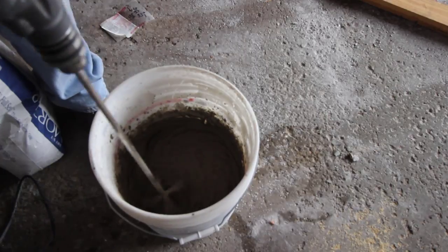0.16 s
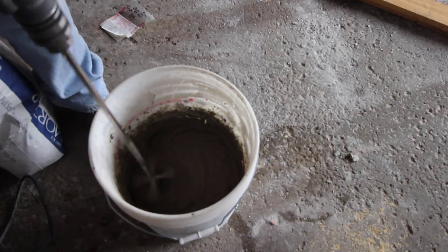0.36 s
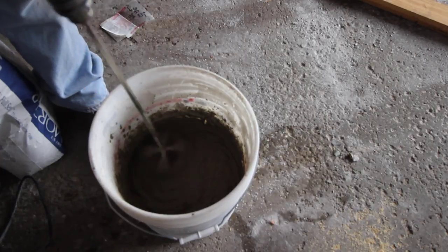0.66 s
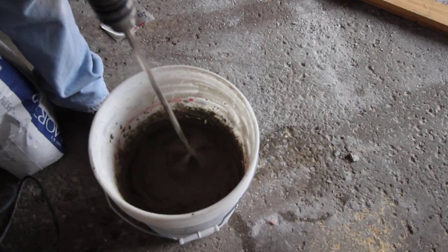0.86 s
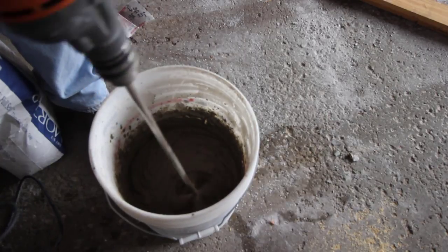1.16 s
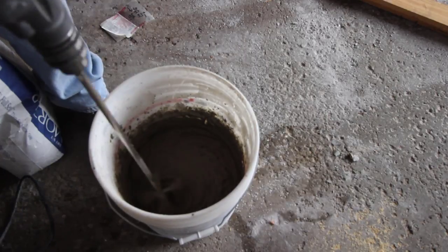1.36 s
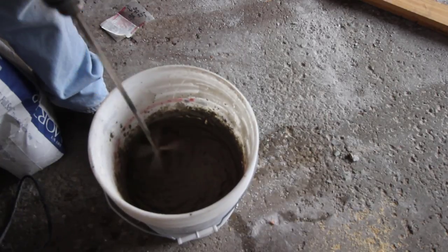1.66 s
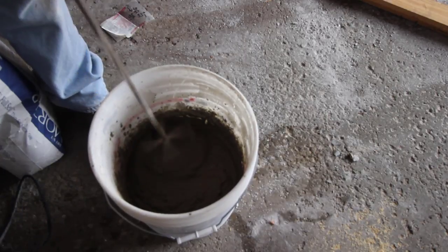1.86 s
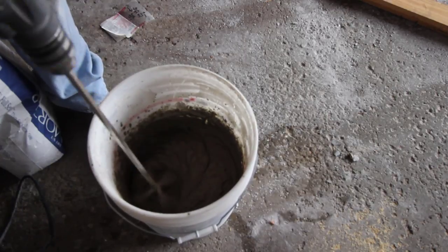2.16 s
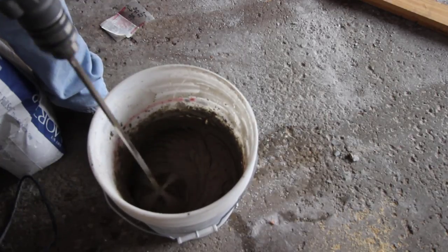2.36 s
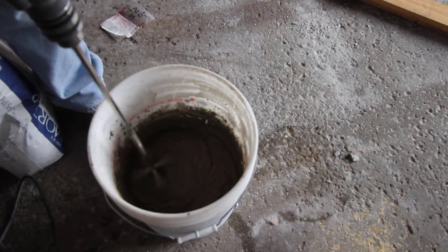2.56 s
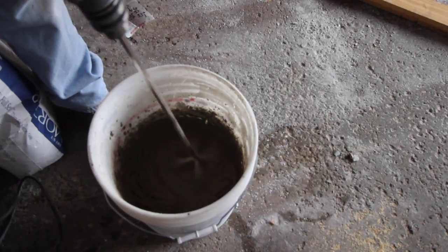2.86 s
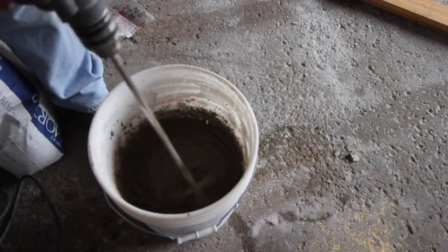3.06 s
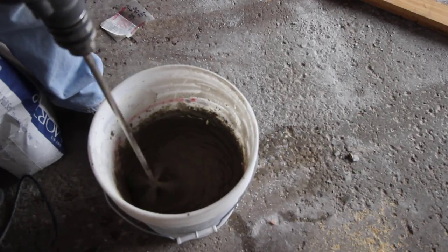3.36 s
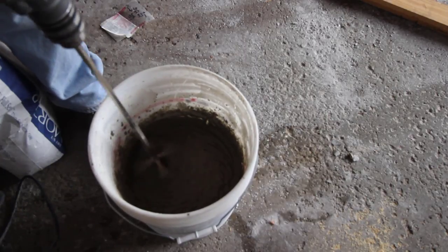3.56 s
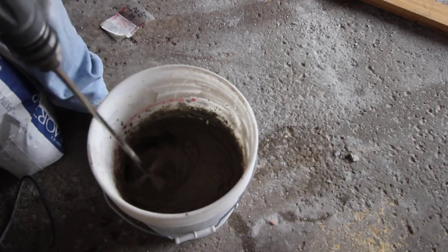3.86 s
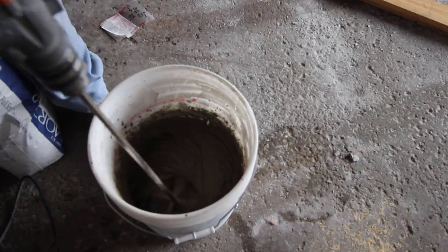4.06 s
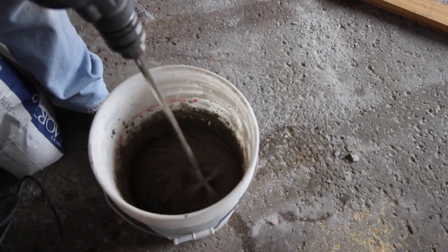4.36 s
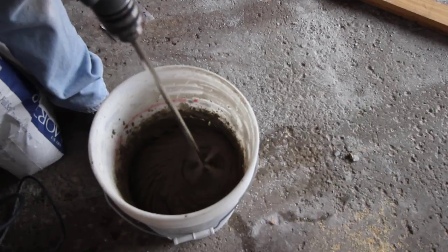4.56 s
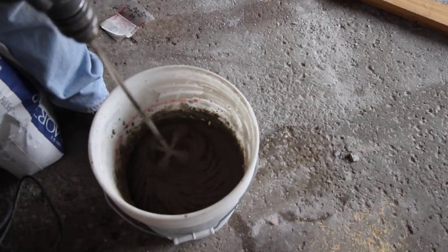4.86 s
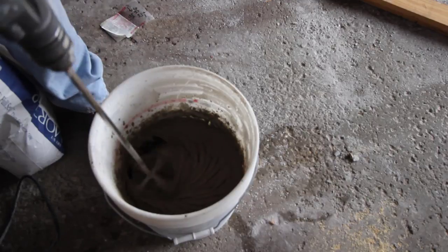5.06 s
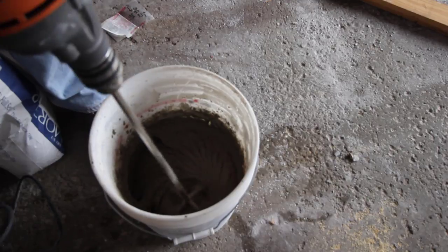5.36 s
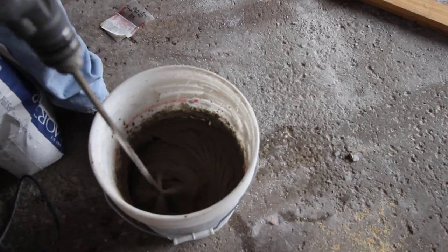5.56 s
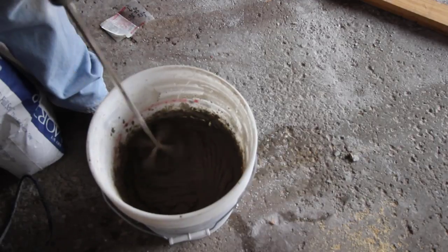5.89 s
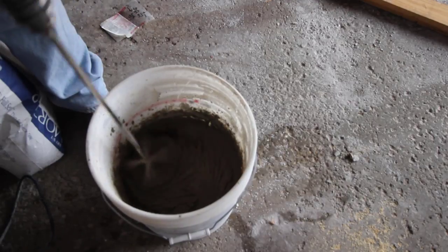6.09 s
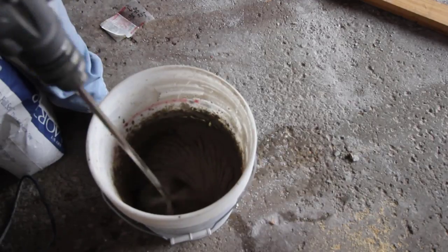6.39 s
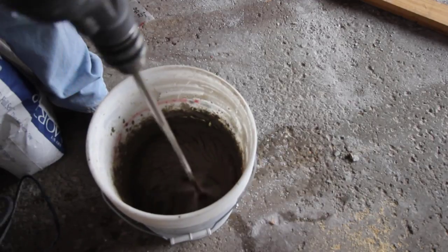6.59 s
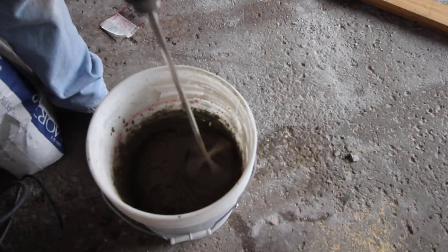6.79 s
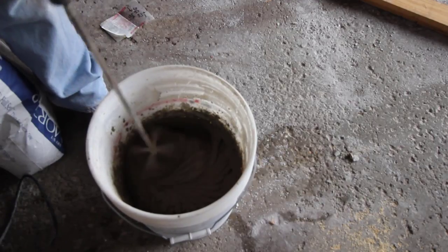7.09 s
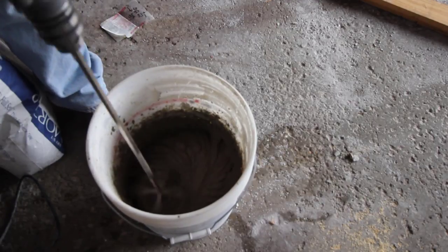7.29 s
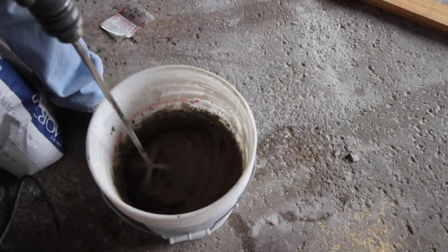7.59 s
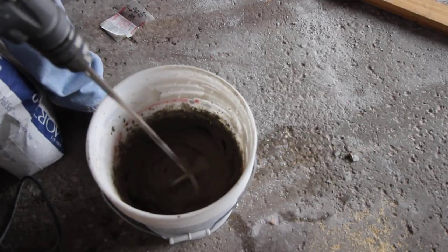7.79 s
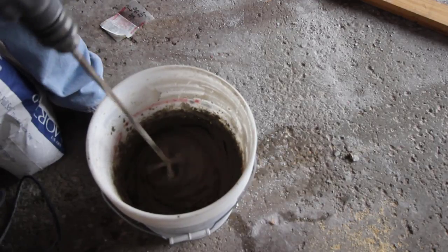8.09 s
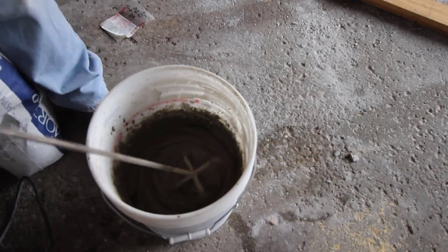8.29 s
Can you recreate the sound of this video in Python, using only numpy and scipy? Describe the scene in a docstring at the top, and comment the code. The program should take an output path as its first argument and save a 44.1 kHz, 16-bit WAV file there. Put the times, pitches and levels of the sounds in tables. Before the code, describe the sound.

An electric drill already turning whines, buzzes and hisses, briefly speeding up near one second, labouring near four and five, then recovering. Thick mortar sloshes with low, hollow plastic thumps, gritty squelches and uneven surges; the chuck chatters and clinks. The sound is close and thin in the bass, with a short hard room reflection. Right at the end the motor cuts out over a bump.

```python
"""Bare concrete room: a mains drill at part trigger turns a paddle through wet mortar in a plastic bucket.
Its speed wavers with the drag: gears whine as tooth harmonics, fan and brushes hiss as coloured noise,
and the speed control buzzes the motor in short current pulses. The paddle slops the mortar and knocks
the bucket (noise and pushes through damped modes), the chuck rattles; at the end the trigger is let go."""
import sys
import numpy as np
from scipy import signal
from scipy.fft import rfft, irfft, next_fast_len
from scipy.io import wavfile
from scipy.ndimage import uniform_filter1d

SR = 44100
rng = np.random.default_rng(int(sys.argv[2]) if len(sys.argv) > 2 else 0)


def to_wav(sig):
    """Store sig (one row per channel, or 1-D mono) as 16-bit WAV at the path in sys.argv[1].

    Samples outside -1..1 are clipped; the rate is SR.
    """
    pcm = np.clip(np.atleast_2d(sig), -1, 1) * 32767
    pcm = np.round(pcm).astype(np.int16)
    wavfile.write(sys.argv[1], SR, pcm.T)  # frames by channels


N = 372204
T = np.arange(N) / SR

# modes of the bucket with its load of mortar: (frequency [Hz], width [Hz], relative level [dB])
BUCKET_MODES = [(143, 37, -14), (257.4, 33, -0.5), (373, 114, -6), (452, 37, -7), (514, 28.3, 1.5),
                (573.7, 11, 2), (680, 62, -9.5), (1000, 190, -12)]
# response of the motor housing: (frequency [Hz], gain [dB])
HOUSING_RESPONSE = [(800, -30), (3400, -27), (3900, -11), (4450, -5), (5100, 2), (5900, -0.5), (7000, -15),
                    (9000, -19.5), (10200, 2.5), (11500, -8.5), (14000, -17)]
# spectrum of loose clatter, also of wet sand: (frequency [Hz], gain [dB])
CLATTER_SPECTRUM = [(100, -30), (400, -5), (1000, -4), (1700, 1), (2700, 1), (3600, 0.5), (4500, -2.5),
                    (6000, -3), (15500, -20)]

MAINS_PULSE_HZ = 120.03  # one pulse each half wave
RELEASE_S = 8.27  # the trigger is let go
WHEEL_TEETH, BAR_EDGES_PER_TOOTH = 39, 12
RATTLE_RISE_S, RATTLE_DECAY_S = 0.0019, 0.0046


def undb(db):
    """Decibels to gain."""
    return 10 ** (np.asarray(db) / 20)


def unit(x):
    """Scale to rms 1."""
    return x / np.sqrt(np.mean(x ** 2))


def curves(table):
    """Columns of a table of timed rows, interpolated to one value a sample."""
    times_s, *columns = np.transpose(table)
    return [np.interp(T, times_s, column) for column in columns]


def response(points, hz):
    """Gain of a (Hz, dB) outline at the given frequencies."""
    point_hz, db = np.transpose(points)
    return undb(np.interp(np.log(hz + 1), np.log(point_hz), db))


def colour(x, points):
    """Filter by a (Hz, dB) outline."""
    size = next_fast_len(N)
    hz = np.arange(size // 2 + 1) * SR / size
    return irfft(rfft(x, size) * response(points, hz), size)[:N]


def noise():
    """White noise of rms 1."""
    return rng.standard_normal(N)


def walk(rate_hz):
    """Smooth random curve of rms 1 that takes a new course rate_hz times a second."""
    hold = max(int(SR / rate_hz), 1)
    steps = np.repeat(rng.standard_normal(N // hold + 1), hold)[:N]
    return unit(uniform_filter1d(steps, hold))


def grains(rate_hz, spread_db):
    """Random clicks of uneven size and either sign, scaled to rms 1."""
    hits = rng.random(N) < rate_hz / SR
    size = undb(spread_db * np.clip(noise(), -2, 2))
    return unit(hits * np.sign(noise()) * size)


def bell(s, length_s):
    """Smooth rise and fall around a moment, 1 at its height and 1/e half a length away."""
    return np.exp(-(2 * (T - s) / length_s) ** 2)


def bursts(table, rise_s, decay_s):
    """Envelope that swells to each event's level and dies away."""
    out = np.zeros(N)
    for s, db in table:
        near = slice(max(int((s - .15) * SR), 0), int((s + .3) * SR))
        age_s = T[near] - s
        out[near] += undb(db) * np.exp(np.minimum(age_s / rise_s, -age_s / decay_s))
    return out


def resonate(x, hz, width_hz):
    """One damped resonance, gain 1 at its centre."""
    return signal.lfilter(*signal.iirpeak(hz, hz / width_hz, fs=SR), x)


def room_air():
    """Room background: noise weighted to the bass."""
    # (frequency [Hz], gain [dB])
    air_spectrum = [(25, -3.5), (500, -19), (15000, -24)]
    return unit(colour(noise(), air_spectrum))


def room(x, wet_db):
    """Concrete floor and walls return a short, dense tail of decaying noise."""
    t60_s = 0.42
    age_s = T[:SR // 2]
    tail = rng.standard_normal(len(age_s)) * undb(-60 * age_s / t60_s) * (age_s > .003)
    return x + undb(wet_db) * signal.fftconvolve(x, tail / np.linalg.norm(tail))[:N]


def hum():
    """Field coils hum on steady mains harmonics for as long as the trigger is held."""
    # (multiple of the pulse rate, relative level [dB])
    hum_lines = [(6, 1), (10, 0.5)]
    out = 0
    for multiple, db in hum_lines:
        out = out + undb(db) * np.sin(2 * np.pi * (multiple * MAINS_PULSE_HZ * T + rng.random()))
    return out * (T < RELEASE_S)


def bucket(x):
    """Damped modes of the plastic wall and the air above the mortar."""
    return sum(undb(db) * resonate(x, hz, width_hz) for hz, width_hz, db in BUCKET_MODES)


def stirred_bucket(x, wander_s, patchy_db):
    """The moving paddle favours now one mode, now another; the shifting load bends their pitch."""
    ring = 0
    for hz, width_hz, db in BUCKET_MODES:
        ring = ring + undb(db + patchy_db * np.tanh(walk(14))) * resonate(x, hz, width_hz)
    return unit(np.interp(T + wander_s * walk(10), T, ring))


def knocks(contact_s):
    """The paddle bumps the bucket: each push and rebound rings the wall modes."""
    # (time [s], level [dB])
    bumps = [(2.135, -46), (2.166, -43), (3.074, -43), (4.046, -41.5), (4.111, -41), (4.15, -37),
             (7.402, -54), (7.446, -41.5), (8.305, -35.5), (8.321, -45), (8.332, -41)]
    push = np.gradient(bursts(bumps, contact_s, contact_s))
    ring = bucket(push)
    return ring / np.abs(ring).max() * undb(np.max(np.array(bumps)[:, 1]))


def churn(octaves):
    """Churning level in dB: steady stirring plus the power of a surge wherever the blades bite."""
    # blades bite into thick mortar: (time of the height [s], length [s], level [dB])
    surges = [(0.103, 0.5, -62.5), (2.163, 0.16, -61.5), (2.397, 0.21, -63.5), (3.07, 0.35, -59),
              (3.858, 0.31, -62), (4.166, 0.13, -52), (4.382, 0.67, -58), (4.68, 0.18, -57.5),
              (5.39, 0.12, -57.5), (5.814, 0.1, -58.5), (6.23, 0.24, -61), (7.015, 0.2, -59),
              (7.437, 0.076, -57.5), (7.9, 0.41, -60.5), (8.321, 0.14, -49)]
    stir_db, stir_db_per_octave = -67, 1.5  # stirring grows slightly louder as the drill speeds up
    power = undb(stir_db + stir_db_per_octave * octaves) ** 2
    for s, length_s, db in surges:
        power = power + undb(db) ** 2 * bell(s, length_s) ** 2
    return 10 * np.log10(power)


def contact():
    """Mortar gain: the paddle spins clear in its hollow, a dip just before and just after each moment."""
    # (time of the middle [s], spacing of its two dips [s])
    lulls = [(0.991, 0.064), (1.872, 0.052), (3.36, 0.082), (7.322, 0.16)]
    depth = 0
    for s, spacing_s in lulls:
        depth = depth + bell(s, spacing_s) * (2 * (T - s) / spacing_s) ** 2
    return undb(-23 * depth)  # depth peaks at 1/e: dips of 8.5 dB


def mortar(churn_db, turns, slap_rate_hz, slap_db, swell_db, sway_db, drag_db, squelch_db, drag_follow):
    """Blades drag and rub on the low bucket modes, hard slaps ring the higher ones, wet sand squelches."""
    # paddle rubs along the wall, which shudders with a dull note: (time [s], level [dB])
    rub_events = [(0.1, -69), (2.37, -61.5), (3.1, -66), (3.75, -58.5), (4.14, -58), (5.41, -62),
                  (6.22, -62), (6.99, -67)]
    # force of the dragging blades: (frequency [Hz], gain [dB])
    drag_spectrum = [(60, -14), (150, -1.5), (250, 1.5), (400, -7.5), (1500, -19)]
    # force of their slaps: (frequency [Hz], gain [dB])
    slap_spectrum = [(60, -13), (260, -2.5), (480, 5), (1500, -4.5)]
    # each turn of the paddle throws a fresh wave against the wall
    turn_sway = np.sin(2 * np.pi * turns / WHEEL_TEETH)
    swell = undb(swell_db * np.tanh(walk(50)) + sway_db * turn_sway)
    # the drag surges less than the slaps do
    steady = undb(churn_db.mean() + drag_follow * (churn_db - churn_db.mean()))
    rubs = sum(undb(db) * bell(s, length_s=.13) for s, db in rub_events)
    drag_force = (noise() + grains(slap_rate_hz, 2.1)) * swell
    drag = stirred_bucket(colour(drag_force, drag_spectrum), wander_s=0.00061, patchy_db=2.5)
    slap_force = (noise() + undb(slap_db) * grains(slap_rate_hz, 1.5)) * swell
    slaps = stirred_bucket(colour(slap_force, slap_spectrum), wander_s=.001, patchy_db=3.5)
    squelch = unit(colour(grains(1500, 3.2) * swell, CLATTER_SPECTRUM))
    drag_level = np.hypot(steady * undb(drag_db), rubs)
    return undb(churn_db) * slaps + drag_level * drag + steady * undb(squelch_db) * squelch


def ticks():
    """Sharp ticks of steel on steel: very short bursts of bright noise."""
    # (time [s], level [dB])
    tick_events = [(1.634, -38), (1.8412, -39.5), (6.0503, -36.5), (7.0813, -39)]
    # (frequency [Hz], gain [dB])
    steel_spectrum = [(300, -19), (4200, 13.5), (7500, 7), (15500, -7)]
    return unit(colour(noise(), steel_spectrum)) * bursts(tick_events, rise_s=0.00066, decay_s=0.0024)


def rattles():
    """Chuck and gears clatter in their play: short bursts of dense clicks."""
    # (time [s], level [dB])
    rattle_events = [(1.631, -47), (1.671, -50), (1.7652, -41.5), (1.9644, -44), (2.0241, -43),
                     (3.111, -46), (4.2377, -41), (5.117, -47), (5.3502, -41.5), (5.4356, -43.5),
                     (5.7554, -44), (5.7915, -44.5), (5.8449, -44.5), (5.883, -44.5), (5.927, -44),
                     (6.1054, -44), (6.167, -44.5), (7.2062, -47), (7.44, -42), (7.6832, -39.5)]
    clatter = unit(colour(grains(6000, 0.73), CLATTER_SPECTRUM))
    return clatter * bursts(rattle_events, RATTLE_RISE_S, RATTLE_DECAY_S)


def shaft(turns, chuck_db, decay_turns, scatter_db):
    """The paddle shaft clinks in the chuck once a turn, and now and then rings out clearly."""
    # clear rings: (time [s], level [dB])
    clinks = [(2.085, -43), (6.374, -44), (6.407, -41), (7.241, -47)]
    over_chuck_db = -5.5
    ring = unit(resonate(noise(), hz=3450, width_hz=660))
    each_turn = np.exp(-(turns / WHEEL_TEETH % 1) / decay_turns)
    each_turn = unit(each_turn * undb(scatter_db * walk(11)))
    clear = bursts(clinks, RATTLE_RISE_S, RATTLE_DECAY_S)
    return ring * (undb(chuck_db + over_chuck_db) * each_turn + clear)


def chuck(turns, swing_db, chatter_db):
    """The loose chuck chatters: clicks that swell once a turn of the paddle."""
    sway = np.sin(2 * np.pi * turns / WHEEL_TEETH + .5 * walk(4.5))
    clicks = grains(2500, 1.6) * undb(swing_db * sway + chatter_db * walk(30))
    return unit(colour(clicks, CLATTER_SPECTRUM))


def fan_and_brushes(pulses, spark_share, grit_db, flicker_db, shell_db):
    """Fan air with brush crackle that grows with each current pulse; sparser grit rings the hollow shell."""
    # (frequency [Hz], gain [dB])
    hiss_spectrum = [(100, -53), (600, -9), (1000, -10), (2000, -7), (4500, -2), (5600, 3), (7600, -4),
                     (9800, -5.5), (15500, -13.5)]
    # resonances of the drill's shell and vents: (frequency [Hz], width [Hz], relative level [dB])
    shell_modes = [(1580, 99, -1), (2190, 450, 0), (3360, 310, 1), (5030, 340, 4.5), (6270, 340, 0),
                   (8080, 500, -3.5)]
    sparking = 1 + spark_share * (pulses - 1)
    crackle = grains(2500, 3.6) * sparking
    air = unit(colour(noise() + undb(grit_db) * crackle, hiss_spectrum))
    grit = grains(1400, 2.1) * sparking
    shell = unit(sum(undb(db) * resonate(grit, hz, width_hz) for hz, width_hz, db in shell_modes))
    return (air + undb(shell_db) * shell) * undb(flicker_db * walk(70))


def commutator(tooth_hz, turns, smear_rad, flutter_db):
    """Brushes skip over the bar edges twelve times a tooth: a thin, rough whistle."""
    phase = 2 * np.pi * BAR_EDGES_PER_TOOTH * turns + smear_rad * walk(300)
    gain = response(HOUSING_RESPONSE, BAR_EDGES_PER_TOOTH * tooth_hz)
    return gain * np.sin(phase) * undb(flutter_db * walk(25))


def gears(tooth_hz, turns, pulses, flutter_db, smear_rad, spindle_depth, fade_db, rasp_rad):
    """Fluttering tooth harmonics; play and torque pulses shift their phase, the high ones most.
    The weak ones fade in and out, and the wheel sways them all once a turn."""
    # main whines as the tooth load shifts: (time [s], levels of tooth harmonics 2, 3, 4, 5 [dB])
    whines = [(0.0, -59, -69, -59, -70), (0.38, -62.5, -70, -64.5, -58), (0.93, -63, -61, -57, -70),
              (1.06, -69, -66, -72, -69), (1.22, -57, -64, -59, -66), (1.36, -60.5, -56, -62, -63),
              (1.78, -69, -74, -69, -60.5), (1.9, -66, -56.5, -67, -61), (2.28, -59, -68, -58.5, -53.5),
              (2.67, -65, -77, -66, -63), (2.79, -59.5, -62, -63, -57), (3.17, -60, -55, -65, -59),
              (3.55, -71, -63, -61.5, -67), (3.93, -63, -62, -62.5, -61.5), (4.28, -63, -64, -61, -66),
              (4.42, -76, -72, -65, -80), (4.95, -54.5, -67, -59.5, -59), (5.33, -67.5, -66, -73, -78),
              (5.58, -62.5, -67, -57.5, -66), (5.97, -67, -70, -62, -57), (6.85, -59.5, -59, -63.5, -56),
              (7.36, -65.5, -68.5, -71, -65), (7.49, -60, -64, -58.5, -63), (7.95, -66.5, -69, -58.5, -66),
              (8.15, -65, -71, -66, -66)]
    # weaker lines, quarter steps are the motor shaft: (multiple of the tooth rate, relative level [dB])
    weak_lines = [(1, -7.5), (3.75, -9), (4.25, -10.5), (5.25, -5), (9, -6), (9.75, -8)]
    # response of the gear case: (frequency [Hz], gain [dB])
    case_response = [(1100, -11), (1450, 10.5), (3300, -1), (5200, 4), (6000, -5), (9800, 5)]
    weak_db = -62.5
    lines = [(multiple, np.sqrt(2) * undb(db)) for multiple, db in enumerate(curves(whines), 2)]
    for multiple, db in weak_lines:
        fading = undb(weak_db + db + fade_db * np.tanh(walk(5)))
        lines.append((multiple, fading * response(case_response, multiple * tooth_hz)))
    out, play = 0, walk(170)
    for multiple, gain in lines:
        phase = 2 * np.pi * (multiple * turns + rng.random())
        phase = phase + multiple * (smear_rad * play + rasp_rad * pulses)
        out = out + gain * undb(flutter_db * walk(45)) * np.sin(phase)
    return out * (1 + spindle_depth * np.sin(2 * np.pi * turns / WHEEL_TEETH))


def current(octaves):
    """The speed control fires a short jolt each half wave of the mains, longer at higher speed.
    A labouring motor draws some current between jolts; all fades out over the 20 ms from the release."""
    first_pulse_s, jolt_s = .0001, .00057  # jolt_s: standard deviation at mean speed
    labour_octaves, labour_per_octave = -.21, 0.98  # onset of labouring; growth of the steady current
    from_peak_s = (((T - first_pulse_s) * MAINS_PULSE_HZ + .5) % 1 - .5) / MAINS_PULSE_HZ
    jolts = np.exp(-.5 * (from_peak_s / (jolt_s * 2 ** (octaves / 2))) ** 2)
    between = labour_per_octave * np.maximum(labour_octaves - octaves, 0)
    # 1 until the release, 0 from 20 ms later
    trigger = np.clip((RELEASE_S - T) / 0.02 + 1, 0, 1)
    return unit(jolts + between) * trigger


def motor(tooth_hz, turns, pulses, smear_rad, jolt_twist_rad, resonance_share, uneven_db,
          ring_hz, ring_width_hz, ring_db):
    """Slots and bars pull on the resonant housing; each jolt twists their phase and rings the stator."""
    # pull of armature slots and commutator bars: (multiple of the tooth rate, relative level [dB])
    pull_lines = [(3, -6), (6, -2.5), (12, -11), (18, -4)]
    out, power = 0, 0
    for multiple, db in pull_lines:
        gain = undb(db) * response(HOUSING_RESPONSE, multiple * tooth_hz)
        phase = 2 * np.pi * multiple * turns + jolt_twist_rad * pulses + smear_rad * walk(400)
        out = out + gain * np.sin(phase)
        power = power + gain ** 2 / 2
    # only a share of the housing's level swings is kept
    evened = out / np.sqrt(power) ** (1 - resonance_share)
    buzz = pulses * undb(uneven_db * walk(120)) * evened
    return buzz + undb(ring_db) * resonate(buzz, ring_hz, ring_width_hz)


def scene():
    """Drill and bucket side by side in the room."""
    # motor speed: (time [s], tooth rate of the pinion [Hz])
    speed = [(0.01, 997), (0.1, 879), (0.34, 964), (0.68, 990), (0.78, 1075), (0.9, 1295), (0.99, 1437),
             (1.09, 1504), (1.145, 1473), (1.295, 1128), (1.44, 1050), (1.68, 974), (1.75, 997),
             (1.94, 1139), (2.2, 1035), (2.46, 984), (2.65, 928), (2.81, 1053), (3.04, 1110), (3.3, 1023),
             (3.74, 975.4), (4.05, 895), (4.18, 789.6), (4.31, 771), (4.44, 886), (4.52, 924),
             (4.71, 882.7), (5.1, 736), (5.21, 725.5), (5.39, 803.6), (5.5, 805), (5.75, 876), (6.07, 1059),
             (6.46, 955), (6.58, 974), (6.89, 1079), (7.0, 1074), (7.29, 895.5), (7.42, 950), (7.5, 869),
             (7.63, 804.5), (7.74, 809), (7.9, 885), (8.18, 894.5), (8.35, 561), (8.44, 331)]
    # drill's treble, shared by hiss and whistle: (time [s], level [dB])
    treble = [(0.0, -54), (0.45, -53.5), (1.0, -51.5), (1.52, -53.5), (1.87, -59.5), (1.96, -53.5),
              (2.94, -53.5), (3.19, -55.5), (3.97, -53.5), (4.5, -58.5), (4.85, -53.5), (5.51, -56),
              (6.89, -52.5), (7.14, -55.5), (8.09, -54), (8.25, -58.5)]
    # chuck's clatter: (time [s], level [dB])
    chuck_level = [(0.0, -54.5), (1.05, -60.5), (1.35, -56.5), (1.87, -65), (1.97, -67), (2.57, -55.5),
                   (4.02, -56.5), (4.18, -52.5), (5.1, -59.5), (7.4, -70.5), (7.67, -55.5), (8.25, -53)]
    # motor's buzz as trigger and drag change its current: (time [s], level [dB])
    buzz_level = [(0.0, -60), (0.35, -50), (0.82, -55), (0.94, -48), (1.14, -47.5), (1.28, -58),
                  (1.55, -52.5), (1.92, -56.5), (2.58, -51), (3.1, -50.5), (3.6, -52.5), (4.08, -57.5),
                  (4.3, -51.5), (4.7, -50), (4.83, -61), (4.97, -53.5), (5.38, -50.5), (5.7, -51.5),
                  (6.15, -54), (6.75, -50.5), (7.18, -57), (7.35, -49.5), (7.53, -55), (7.8, -52),
                  (8.25, -52.5)]
    tooth_hz, = curves(speed)
    treble_db, = curves(treble)
    chuck_db, = curves(chuck_level)
    buzz_db, = curves(buzz_level)
    octaves = np.log2(tooth_hz / tooth_hz.mean())
    # lumps in the mix make the speed shiver; turns counts pinion teeth
    turns = np.cumsum(tooth_hz * (1 + 0.003043 * walk(50))) / SR
    pulses = current(octaves)

    mix = contact() * mortar(churn(octaves), turns, slap_rate_hz=110, slap_db=-0.5, swell_db=4.5,
                             sway_db=4.0, drag_db=-4.5, squelch_db=-5, drag_follow=0.2)
    mix += knocks(contact_s=0.00043)

    drill = gears(tooth_hz, turns, pulses, flutter_db=3.0, smear_rad=0.18, spindle_depth=0.13,
                  fade_db=4.0, rasp_rad=.065)
    drill += undb(buzz_db) * motor(tooth_hz, turns, pulses, smear_rad=0.22, jolt_twist_rad=0.4,
                                   resonance_share=0.43, uneven_db=.5,
                                   ring_hz=4440, ring_width_hz=130, ring_db=-2.5)
    drill += undb(treble_db - 3.5) * commutator(tooth_hz, turns, smear_rad=1.4, flutter_db=3.0)
    # the brushes spark less as the motor runs free
    hiss_db = treble_db + 0.76 - 2.5 * octaves
    drill += undb(hiss_db) * fan_and_brushes(pulses, spark_share=0.29, grit_db=-9.5,
                                             flicker_db=1.48, shell_db=-2.5)
    drill += undb(chuck_db) * chuck(turns, swing_db=2.0, chatter_db=2.5)
    drill += shaft(turns, chuck_db, decay_turns=0.078, scatter_db=3.5)
    coast_db_per_s = 122  # fade once the trigger is let go
    drill *= undb(-coast_db_per_s * np.maximum(T - RELEASE_S, 0))
    drill += undb(-75.5) * hum()
    drill += rattles() + ticks()

    background = undb(-79.5) * room_air()
    return (room(drill, wet_db=-10.5) + room(mix, wet_db=-15.0) + background)[None]


def record(dry):
    """A small microphone: thin bass and a steep cut at the top."""
    thin = signal.sosfilt(signal.butter(1, 130, "high", fs=SR, output="sos"), dry)
    return signal.sosfilt(signal.ellip(10, .2, 60, 15750, fs=SR, output="sos"), thin)


dry = scene()
out = record(dry)
to_wav(out)
```